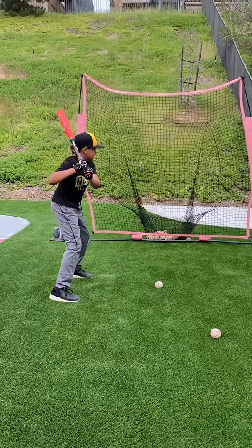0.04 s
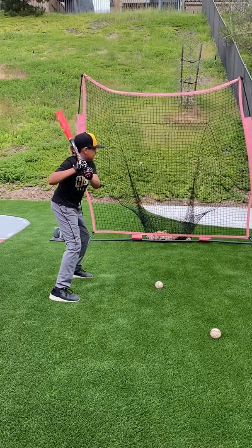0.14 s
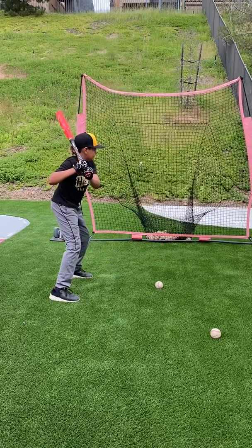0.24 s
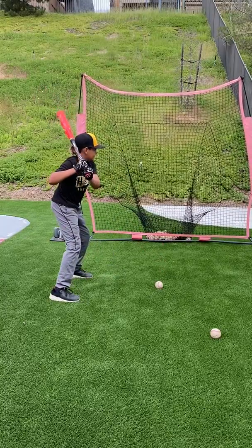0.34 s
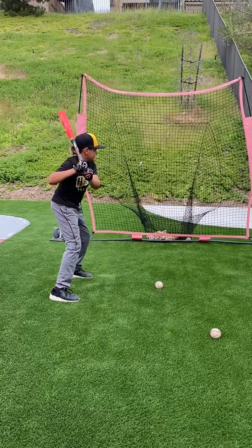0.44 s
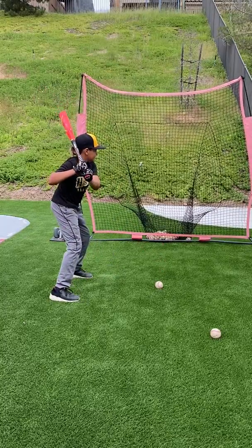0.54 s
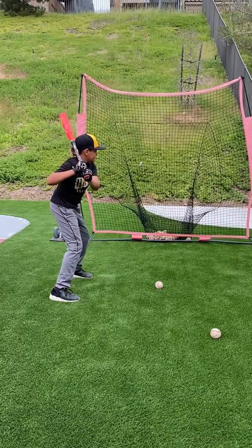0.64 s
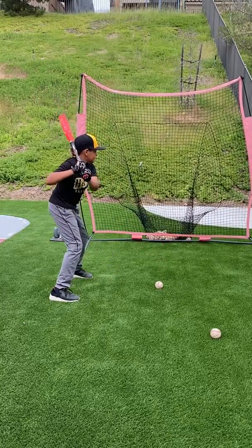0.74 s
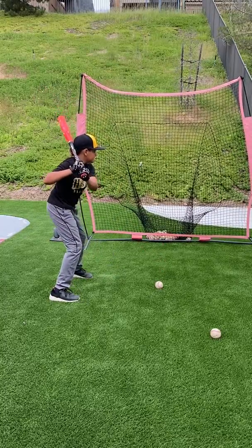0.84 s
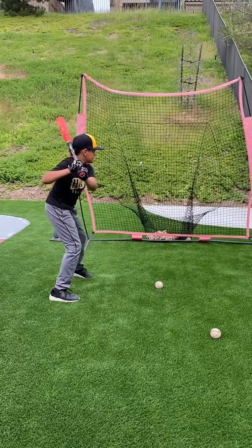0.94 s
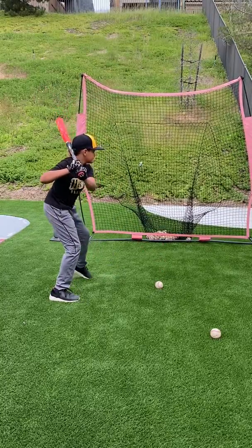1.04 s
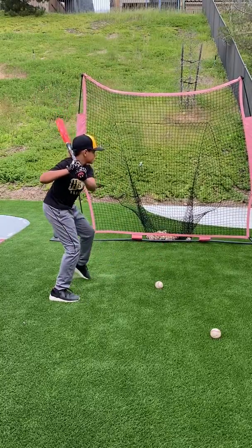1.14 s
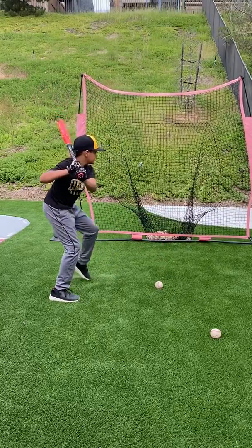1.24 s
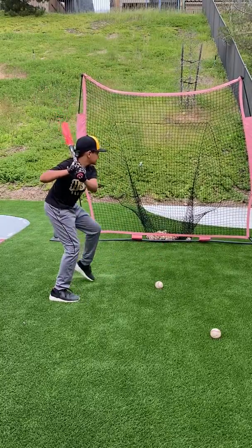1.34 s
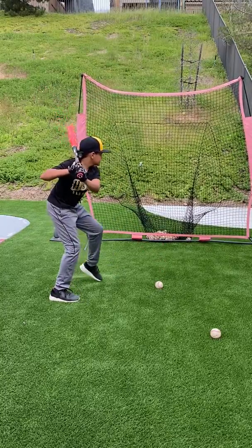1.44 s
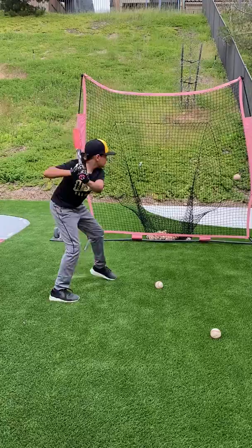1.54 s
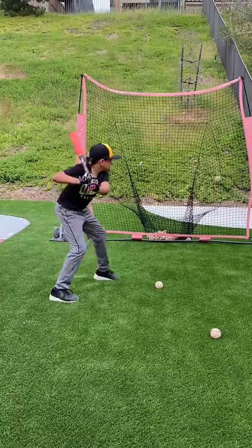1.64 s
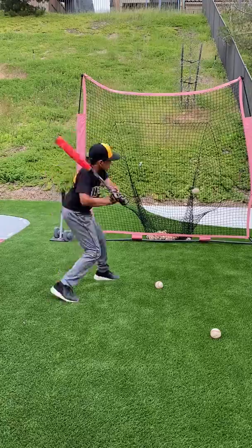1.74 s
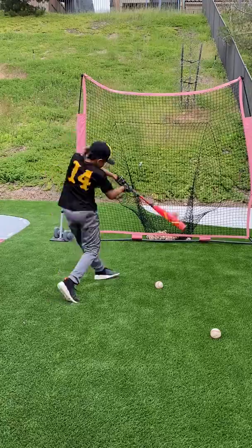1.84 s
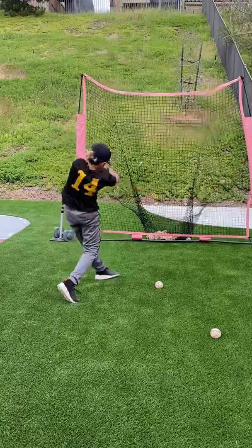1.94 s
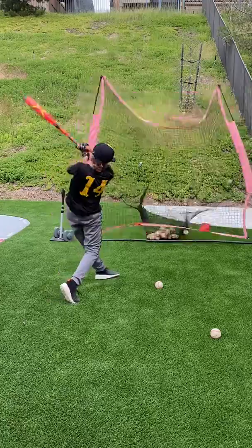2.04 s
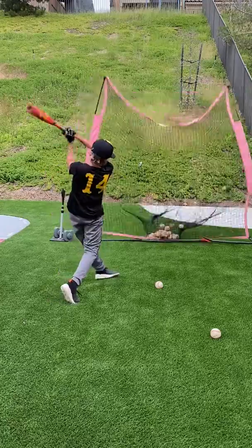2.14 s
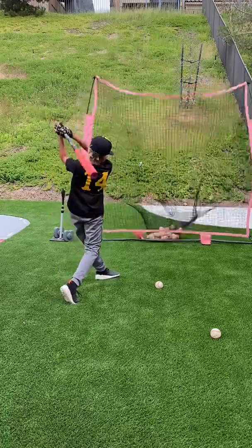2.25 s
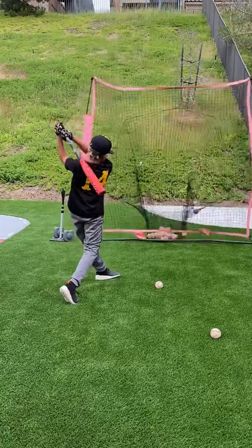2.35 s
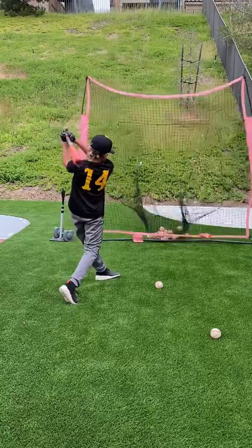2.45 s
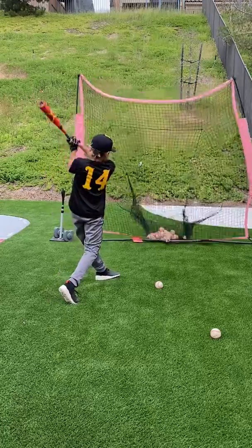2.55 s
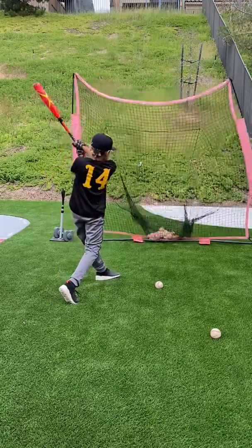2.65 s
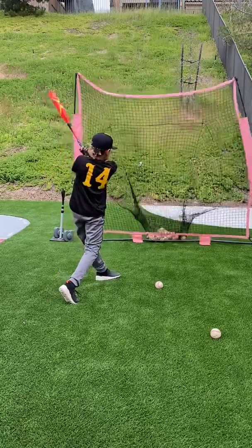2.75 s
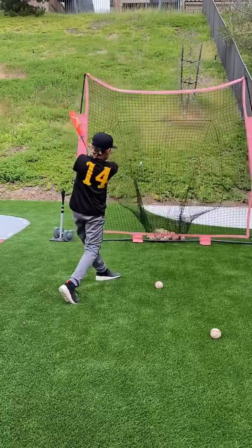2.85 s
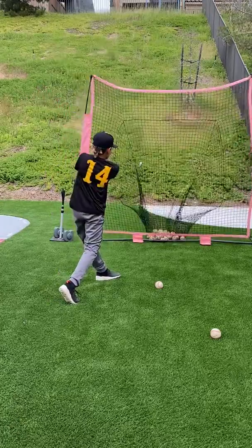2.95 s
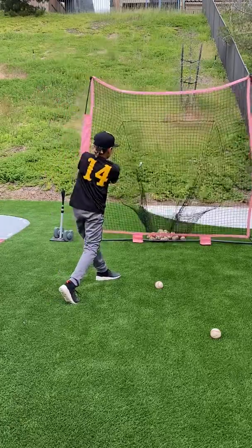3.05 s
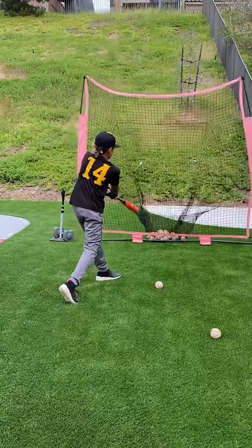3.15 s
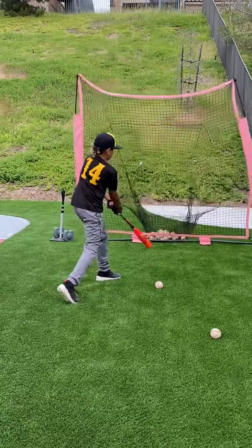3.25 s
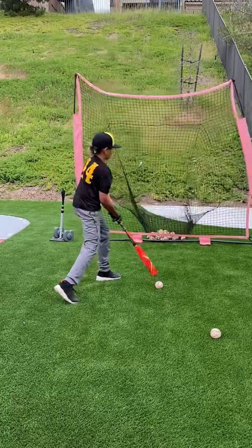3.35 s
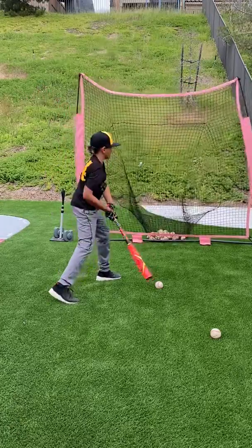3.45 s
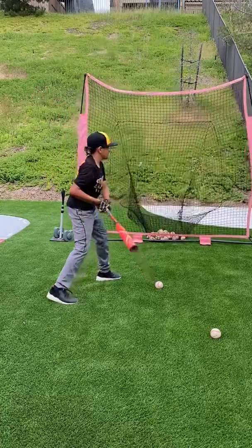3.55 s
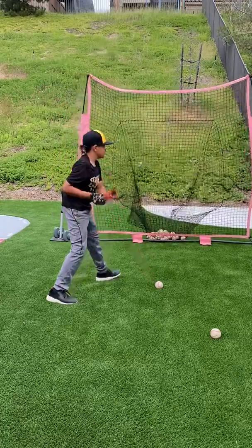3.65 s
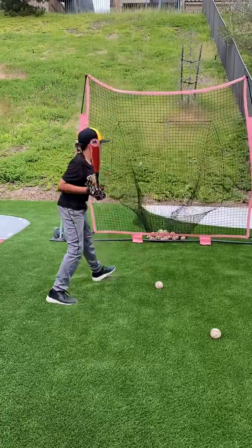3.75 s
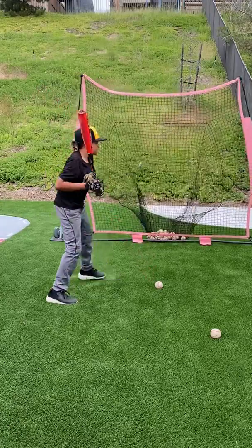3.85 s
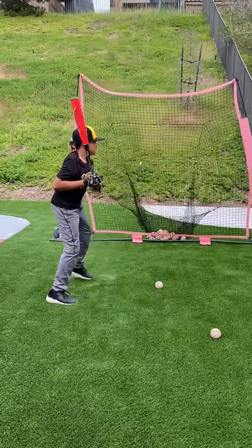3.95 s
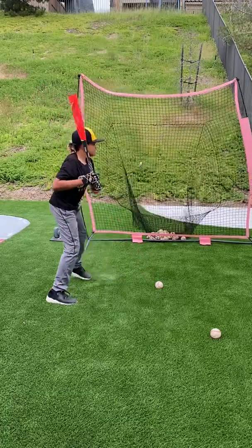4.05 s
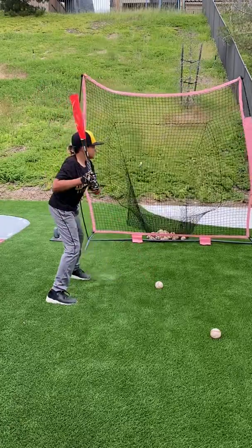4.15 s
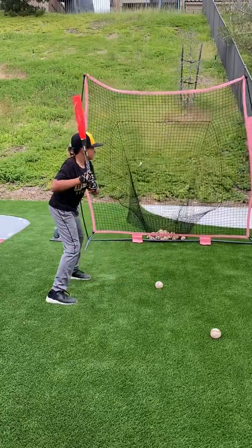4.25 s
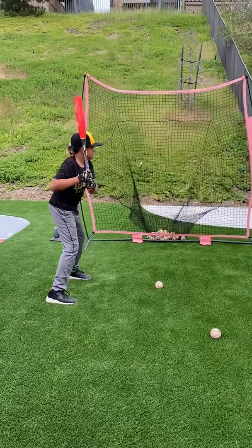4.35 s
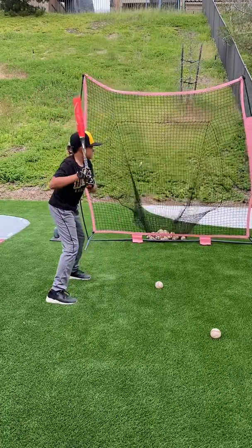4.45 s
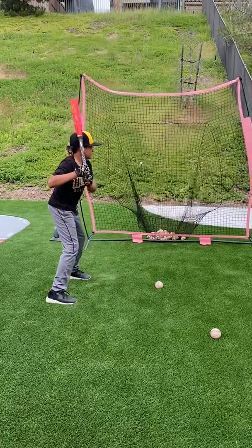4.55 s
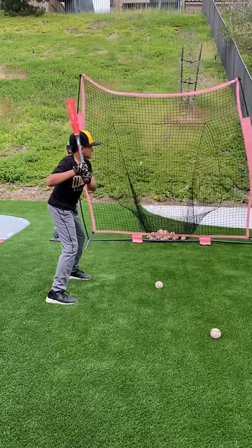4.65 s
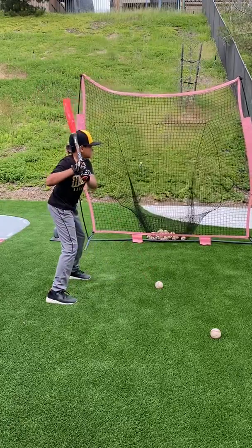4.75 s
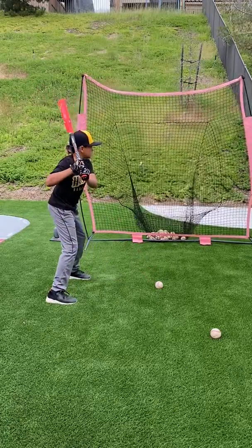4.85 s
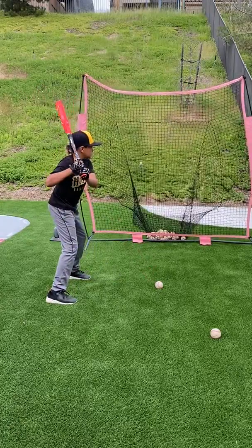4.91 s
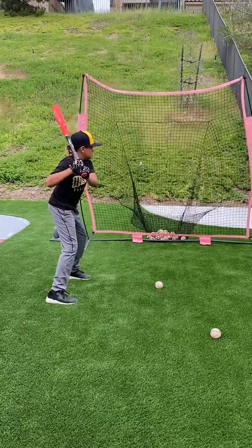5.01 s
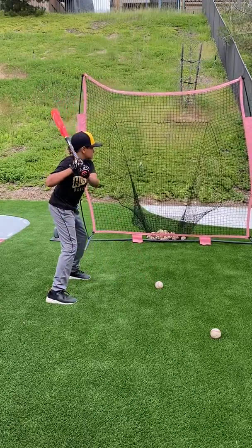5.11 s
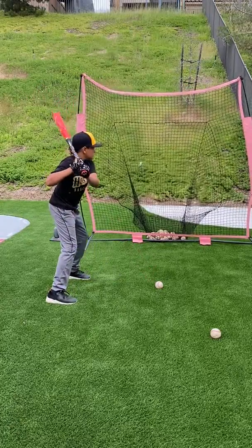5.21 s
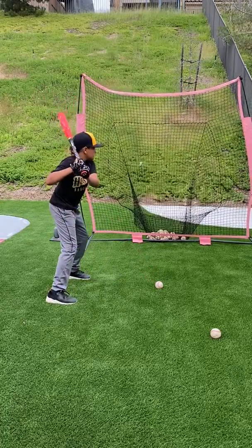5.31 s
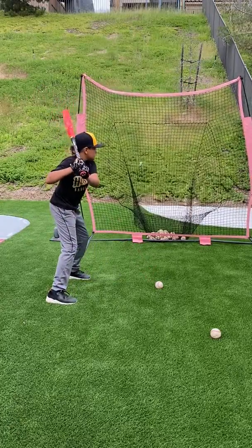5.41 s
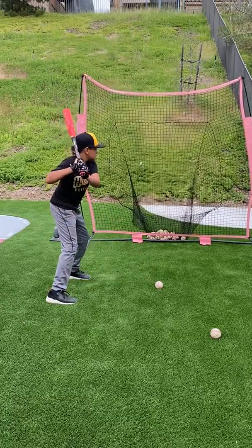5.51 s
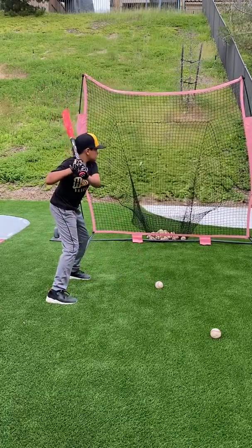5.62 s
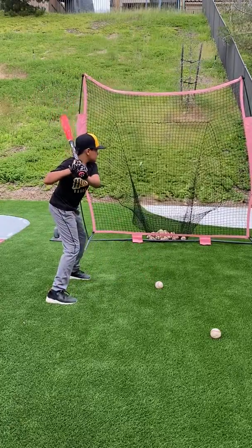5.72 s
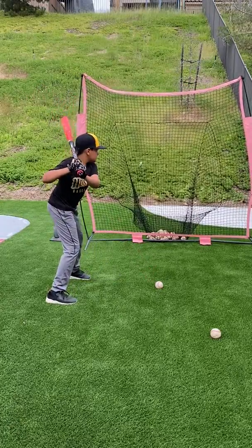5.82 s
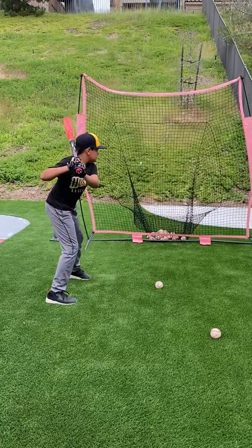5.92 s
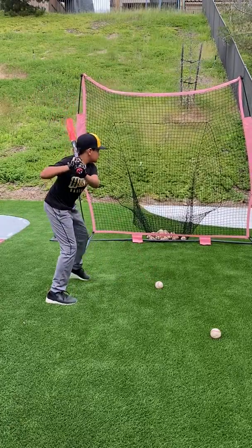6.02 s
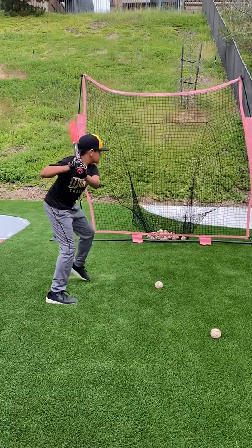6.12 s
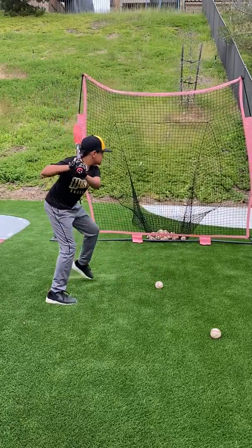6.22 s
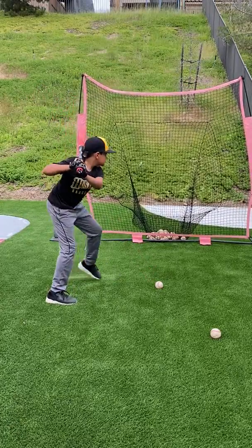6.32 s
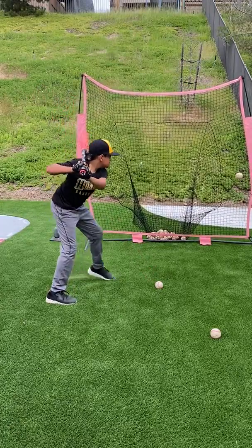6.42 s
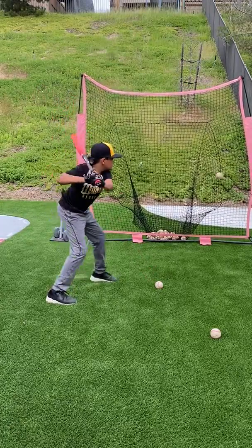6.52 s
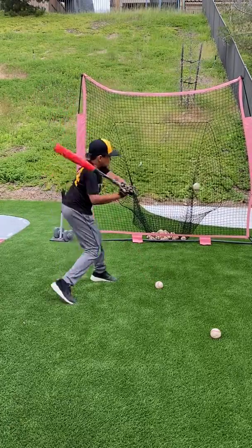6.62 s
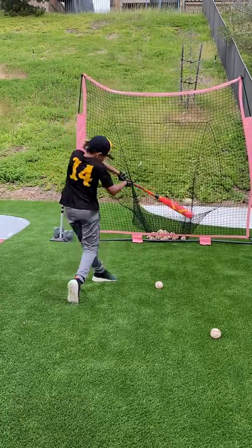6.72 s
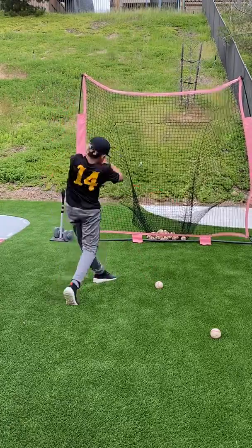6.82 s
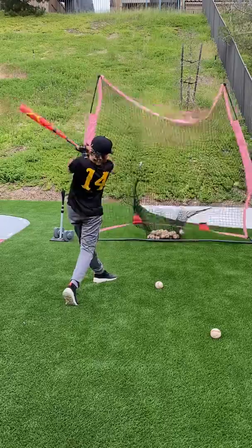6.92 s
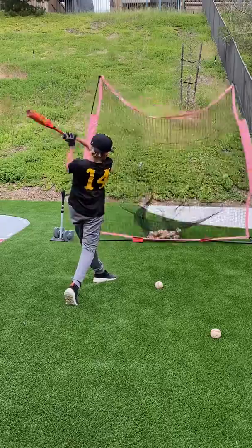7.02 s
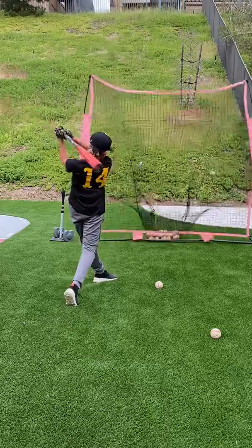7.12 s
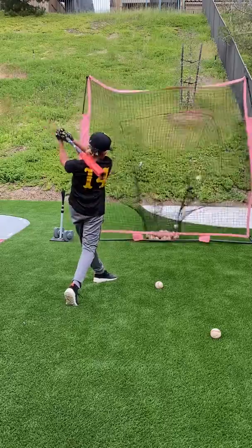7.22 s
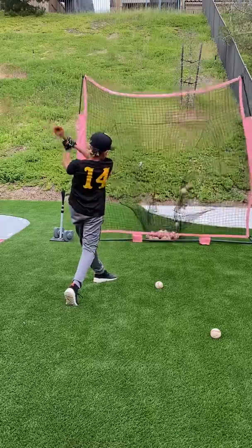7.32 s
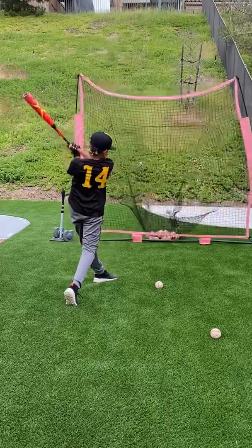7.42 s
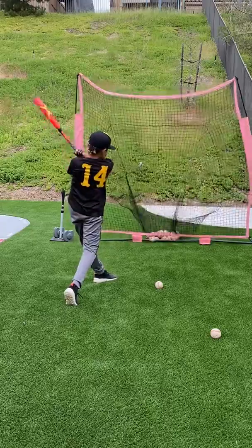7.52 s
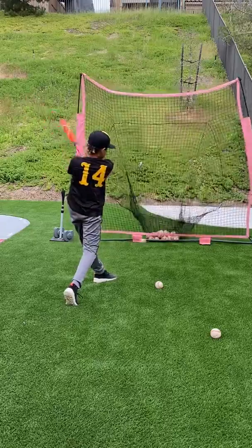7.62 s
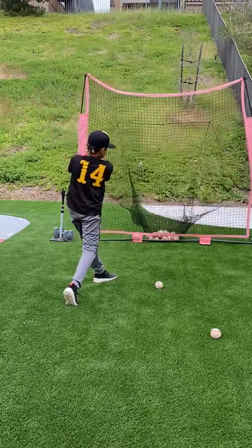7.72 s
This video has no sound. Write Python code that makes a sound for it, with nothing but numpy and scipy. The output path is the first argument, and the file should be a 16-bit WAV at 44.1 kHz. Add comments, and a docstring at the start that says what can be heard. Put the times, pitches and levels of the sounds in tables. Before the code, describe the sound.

A batter hits two balls into a practice net, nearly five seconds apart. Each blow is a short, bright, hollow knock with a brief metallic ring and tight echoes, then a dull thump and a fizzing, clattering shake of net cords. Between them come gentle clothing and footing sounds, thin chirps and far rough bird calls. Beneath lie a steady, slightly wavering plane hum and soft town rumble, captured in stereo from nearby in open air.

```python
"""A hollow bat drives a ball into a practice net twice: it knocks and rings, and fences echo it.
Damped sines make the bat and the thumps of the net; short noise bursts make its ticks. Uneven noise
makes the shaken net, the swings and the rustle of clothes and shoes. Sinking tones and two low hums of
fixed pitch make a far propeller aircraft, gliding sines the songbirds, ringing noise far hoarse calls.
Below lies a town rumble of wide noise."""
import sys
import numpy as np
from scipy import signal
from scipy.fft import rfft, irfft
from scipy.io import wavfile

SR = 44100
rng = np.random.default_rng(int(sys.argv[2]) if len(sys.argv) > 2 else 0)


def waveform_to_disk(signal):
    """Save audio, clipped to [-1, 1], as 16-bit WAV at the path in sys.argv[1]."""
    frames = np.transpose(np.atleast_2d(signal))
    scaled = np.clip(frames, -1, 1) * 32767
    samples = np.round(scaled).astype(np.int16)
    wavfile.write(sys.argv[1], SR, samples)


N = 342654   # length in samples

# bat meets ball: (time [s], level [dB], pitch factor of the spot struck)
BLOWS = [(1.8736, 2, 1.0), (6.7303, 2, 1.015)]
# short knocks of ball and barrel: (frequency [Hz], level [dB], time to die by 60 dB [s])
KNOCK_MODES = [(130, -17.5, .04), (187.4, -17, 0.048), (354, -16, .02), (508, -7.5, 0.018),
               (732, -1.5, 0.0087), (885.3, -5.5, 0.022), (1170, -7, 0.015), (2232, -14.5, 0.011),
               (2918, -17, .012), (4000, -22.5, 0.02), (4280, -28.5, 0.02)]
# hoop ring of the barrel wall: (frequency [Hz], level [dB], time to die by 60 dB [s])
HOOP_MODES = [(1372.6, 1, 0.039), (1512.8, 1.5, 0.032)]
# echoes off fences and walls: (delay [s], hoop level [dB], knock level [dB], left minus right [dB])
FENCE_ECHOES = [(.0075, -17, -10, -0.6), (0.0139, -3.5, -18.5, -1), (0.026, -19, -25.5, 2),
                (0.0325, -21.5, -31.5, -1.83), (0.04, -24, -24, 4), (.071, -31, -33, 3),
                (.084, -20.5, -22, -0.1), (.099, -29, -54.5, -7)]


def bat():
    """Each blow rings all modes and cracks; hard surfaces send copies back, the yard a diffuse tail."""
    knock = struck(KNOCK_MODES) + from_db(-20.5) * crack()
    # the barrel wall builds up over a few cycles
    build_up = signal.butter(1, [1200, 1750], "band", fs=SR, output="sos")
    hoop = from_db(-2) * signal.sosfilt(build_up, struck(HOOP_MODES))
    out = knock * sides(.1) + from_db(-4.5) * np.array([later(hoop, .0001), hoop])
    for delay, hoop_db, knock_db, pan_db in FENCE_ECHOES:
        echo = from_db(hoop_db) * hoop + from_db(knock_db) * knock
        out += later(echo, delay) * sides(pan_db)

    t = np.arange(SR) / SR
    tail_fade = from_db(-60 * t / 0.6 - 48.5) + from_db(-60 * t / .07 - 35)   # one slow, one quick
    mid, side = rng.standard_normal((2, SR)) * tail_fade * (t > .008)
    into_yard = hoop + from_db(1) * knock
    for ear, sign in enumerate((1, -1)):
        out[ear] += signal.fftconvolve(into_yard, mid + sign * .45 * side)[:N]
    return out


def struck(modes):
    """Every blow sets all the given modes ringing, each a sine that dies away."""
    out = np.zeros(N)
    click = np.eye(1, SR)[0]
    for k, (hz, db, t60) in enumerate(modes):
        sign = (-1) ** k   # every second mode starts the other way
        for s, blow_db, pitch in BLOWS:
            start = round(s * SR)
            out[start:start + SR] += sign * from_db(blow_db + db) * ring(click, hz * pitch, t60)
    return out


def crack():
    """A noise burst at each blow that dies by 60 dB in 0.022 s."""
    clicks = np.zeros(N)
    for s, db, _ in BLOWS:
        clicks[round(s * SR)] = from_db(db)
    fade = signal.lfilter([1], [1, -from_db(-60 / (0.022 * SR))], clicks)
    return signal.lfilter([1], [1, -.3], fade * rng.standard_normal(N))   # slightly dulled


# ball and net frame thump down: (time [s], level [dB], frequency [Hz], time to die by 60 dB [s])
NET_THUMPS = [(1.998, -15.5, 97, 0.0239), (2.011, -30.5, 64, 0.13), (6.856, -23.5, 113.3, 0.056),
              (6.866, -24.5, 70, 0.134), (6.909, -30, 90, 0.045), (7.585, -36, 402, 0.0154)]
# ticks and slaps of net, frame and balls: (time [s], level [dB])
NET_TICKS = [(1.9713, -30.5), (2.0039, -40), (2.0357, -41.5), (2.0504, -44.5), (2.0744, -49), (2.1083, -54),
             (2.16, -47), (2.2855, -59), (2.5111, -53), (2.59, -60), (2.638, -58), (5.216, -65.5),
             (5.754, -62.5), (6.8399, -28), (6.86, -32.5), (6.8734, -34), (6.8937, -33.5), (6.9468, -40),
             (7.0396, -44.5), (7.5778, -41.5)]
TICK_T60_S = 0.0333   # time to die by 60 dB


def net():
    """Low thumps are damped sines set off by a push, ticks are short bright noise bursts."""
    out = np.zeros(N)
    click = np.eye(1, SR // 2)[0]
    for s, db, hz, t60 in NET_THUMPS:
        part = out[round(s * SR):][:len(click)]
        part += from_db(db) * ring(click, hz, t60)[:len(part)]

    band = signal.butter(2, [2000, 7000], "band", fs=SR, output="sos")
    t = np.arange(2000) / SR
    for s, db in NET_TICKS:
        burst = rng.standard_normal(2000) * from_db(db - 60 * t / TICK_T60_S)
        out[round(s * SR):][:2000] += signal.sosfilt(band, burst)
    return out


# colours of the rubbing noise, each: (frequency [Hz], level per Hz [dB])
HISS_COLOUR = [(3000, -6), (4500, -3), (6000, -2), (7500, -7), (10000, -1), (13000, -3), (15500, -2)]
SWISH_COLOUR = [(900, -11), (1500, 2.5), (2200, -3), (3200, -6.5), (4500, -8.5), (6500, -20)]
RATTLE_COLOUR = [(150, -16), (300, 3), (600, -0.5), (1000, -4), (1500, -6.5), (2200, -21.5)]


def rustle():
    """Dense uneven grains of fibres rubbing, in three colours; the low rattle is the most uneven."""
    colours, flickers_db = (HISS_COLOUR, SWISH_COLOUR, RATTLE_COLOUR), (1.3, 1.7, 2.5)
    likeness = [(500, 0.37), (1500, 0.52), (3000, 0.93)]   # (frequency [Hz], left-right likeness)
    out = slaps(np.sqrt(shaking()[-1]))   # as strong as the rattle of the shaken net
    for gain, colour, flicker_db in zip(motion(), colours, flickers_db):
        flicker = from_db(flicker_db * (drift(27) + drift(150)))
        grains = rng.standard_normal((2, N)) * flicker
        out = out + gain * coloured(grains, colour, likeness)
    return out


SLAPS_PER_S, SLAP_DB = 200, -1   # average rate; level
SLAP_LOW_HZ, SLAP_HIGH_HZ, SLAP_CYCLES = 300, 3600, 9.0   # pitch range; cycles to die by 60 dB


def slaps(strength):
    """Cords and balls slap while the net shakes: uneven clicks dealt to twelve short resonances."""
    boost_db = 5 * np.minimum(rng.exponential(1, N), 4)
    clicks = from_db(boost_db) * (rng.random(N) < SLAPS_PER_S / SR)
    dealt = rng.integers(0, 12, N)   # which resonance each click strikes
    ringing = np.zeros(N)
    for k, hz in enumerate(np.geomspace(SLAP_LOW_HZ, SLAP_HIGH_HZ, 12)):
        ringing += ring(clicks * (dealt == k), hz, SLAP_CYCLES / hz)
    duller = signal.lfilter([1], [1, -.7], ringing)
    return from_db(SLAP_DB) * strength * rms_one(duller)


# a ball shakes the net:
# (time [s], hold [s], time to fall 20 dB [s], hiss level [dB], swish level [dB], rattle level [dB])
NET_SHAKES = [(1.953, 0.0257, .12, -56, -40, -43), (2.048, .03, .15, -65, -47, -51),
              (6.865, .035, .1, -55, -38, -44), (6.948, .01, .09, -64, -47, -50),
              (7.1, .03, .1, -73, -66, -61), (7.493, .03, .1, -81, -74, -66),
              (7.584, .005, .04, -63, -64, -54), (7.68, .03, .1, -100, -82, -59)]
SHAKE_RISE_S = .055   # time to rise 20 dB
SWAY_DB, SWAY_FALL_S = -25, .6   # it sways on, fainter; time to fall 20 dB


def shaking():
    """Hiss, swish and rattle power of the shaken net, each shake with a slower, fainter sway."""
    power = 0
    for s, hold, fall, *levels_db in NET_SHAKES:
        shake = swell(s, hold, SHAKE_RISE_S, fall)
        sway = from_db(SWAY_DB) ** 2 * swell(s, hold, SHAKE_RISE_S, SWAY_FALL_S)
        power = power + np.outer(from_db(levels_db) ** 2, shake + sway)
    return power


# a swing before each blow: (loudest this long before it [s], hiss, swish and rattle level [dB])
BAT_SWINGS = [(.19, -65, -61, -64), (.09, -68, -59, -61)]
# the swing holds; times to rise and fall 20 dB
SWING_HOLD_S, SWING_RISE_S, SWING_FALL_S = .04, .18, .3
# cloth and shoes move:
# (time [s], hold [s], time to rise 20 dB [s], to fall 20 dB [s], hiss level [dB], swish level [dB])
CLOTH_MOVES = [(0.0, .01, .1, 0.3, -94, -71), (1.073, 0.037, .12, .2, -76, -76),
               (1.3, .1, .3, .3, -90, -80), (1.56, .03, .09, .3, -75, -74), (2.25, .03, .1, .25, -73, -70),
               (2.53, .01, .15, 0.59, -77, -73), (2.66, .01, 0.64, .1, -73, -86),
               (2.87, .02, .15, .4, -87, -77), (3.28, .1, .09, .6, -80, -67),
               (3.44, .04, .15, .5, -74, -78), (3.58, .1, .3, .3, -80, -69),
               (3.78, .06, .12, .035, -69, -70), (4.0, .06, .08, .3, -84, -80),
               (4.12, .12, .12, .08, -77, -70), (4.75, .01, .06, .06, -83, -90),
               (5.76, .04, .04, 1.37, -86, -76), (5.93, .03, .2, .2, -86, -79),
               (6.04, .03, .12, .07, -74, -72), (6.49, .07, .07, .3, -73, -65)]
# between movements: (hiss level [dB], swish level [dB], rattle level [dB])
STILL_LEVELS = (-102, -94, -74)


def motion():
    """Hiss, swish and rattle gains: net shakes, swings and movements add up in power."""
    power = shaking() + from_db(STILL_LEVELS)[:, None] ** 2
    for (s, *_), (lead, *levels_db) in zip(BLOWS, BAT_SWINGS):
        swing = swell(s - lead, SWING_HOLD_S, SWING_RISE_S, SWING_FALL_S)
        power += np.outer(from_db(levels_db) ** 2, swing)
    for s, hold, rise, fall, *levels_db in CLOTH_MOVES:
        power[:2] += np.outer(from_db(levels_db) ** 2, swell(s, hold, rise, fall))   # no rattle
    return np.sqrt(power)


def swell(s, hold, rise, fall):
    """Power of a sound that rises, holds from time s and falls; rise and fall are the times for 20 dB."""
    t = np.arange(N) / SR - s
    steps_down = np.maximum(-t / rise, (t - hold) / fall)   # in steps of 20 dB
    return 100.0 ** -np.maximum(steps_down, 0)


# strongest aircraft tone: (time [s], level [dB])
STRONGEST_LEVEL = [(0.1, -50), (0.5, -54), (1.1, -71.5), (1.5, -62.5), (2.15, -52), (3.9, -53.5),
                   (5.3, -47), (6.4, -45), (7.3, -47.5), (7.7, -50.5)]
STRONGEST_MULTIPLE, STRONGEST_PAN_DB, STRONGEST_LEAD = 6, 0, 0.39   # left lead in radians
# weaker tones, fading in and out as two paths cancel:
# (shaft multiple, level [dB], growth [dB/s], second path [0-1], fades [1/s], first fade [s],
#  left minus right [dB], left lead [radians])
WEAKER_TONES = [(4, -59, 0.6161, .55, .42, .9, -1, .1), (8, -67, 0.77, .4, .36, 1.6, -2.5, .1),
                (9, -66.5, 0.7838, .3, .43, 2.3, 2, .1), (12, -66, 0.114, .55, .22, 3.5, 1.39, .1),
                (16, -86, 1.29, 0.3, .35, 1.6, 4.5, .083)]
# second engine tone: (level [dB], growth [dB/s], second path [0-1], fades [1/s], first fade [s])
SECOND_ENGINE = (-55, -0.9847, 0.1, 0.28, 3.5)
# low hums of fixed pitch: (frequency [Hz], level [dB])
LOW_HUMS = [(66.8, -75.5), (79.1, -72.5)]
SHAFT_HZ, SHAFT_FALL = 22.475, .0505   # turns per s; sinking in Hz per s as it passes
SECOND_HZ, SECOND_FALL = 96.4, .32   # Hz; sinking in Hz per s


def aircraft():
    """Tones on shaft multiples and one other tone slide down slowly; two low hums hold their pitch."""
    t = np.arange(N) / SR
    shaft_angle = 2 * np.pi * (SHAFT_HZ - SHAFT_FALL * t / 2) * t
    second_angle = 2 * np.pi * (SECOND_HZ - SECOND_FALL * t / 2) * t
    out = fading(*SECOND_ENGINE) * sides(-1.2) * np.sin(second_angle)

    strongest = from_db(np.interp(t, *np.transpose(STRONGEST_LEVEL)))
    tones = [(STRONGEST_MULTIPLE, strongest, STRONGEST_PAN_DB, STRONGEST_LEAD)]
    for multiple, db, growth_db, second, per_s, first, pan_db, lead in WEAKER_TONES:
        tones.append((multiple, fading(db, growth_db, second, per_s, first), pan_db, lead))
    for multiple, gain, pan_db, lead in tones:
        phase = multiple * shaft_angle + rng.uniform(0, 2 * np.pi) + np.array([[lead], [0]])
        waver = from_db(0.74 * drift(3))   # the level wavers on the long way
        out = out + gain * waver * sides(pan_db) * np.sin(phase)

    for hz, db in LOW_HUMS:
        out = out + from_db(db + 3 * drift(1.5)) * np.sin(2 * np.pi * hz * t)
    return np.sqrt(2) * out   # the levels above are rms levels


def fading(db, growth_db, second, per_s, first):
    """Gain of a tone that reaches us by two paths, which cancel now and then."""
    t = np.arange(N) / SR
    turning = np.exp(2j * np.pi * per_s * (t - first))
    return from_db(db + growth_db * t) * np.abs(1 - np.clip(second, 0, 1) * turning)


# clearest bird notes, slides, arches and dips:
# (time [s], length [s], start [Hz], middle [Hz], end [Hz], level before the paths to the ear [dB])
BIRD_NOTES = [(0.032, .045, 3340, 3563, 2900, -79), (.078, .03, 3300, 4150, 3800, -81),
              (.15, .035, 3500, 4100, 3640, -82), (0.44, 0.0407, 5200, 4944, 4850, -77),
              (0.51, 0.057, 4500, 4550, 3950, -80), (.615, .03, 4060, 4000, 4050, -86),
              (0.692, 0.0554, 3540, 4400, 3070, -77.5), (0.816, 0.0244, 3640, 3600, 3090, -76.5),
              (0.86, 0.057, 3400, 4317, 3100, -76), (1.02, .035, 4600, 4510, 4500, -79),
              (1.33, .025, 6500, 6300, 5000, -84), (1.122, 0.029, 5000, 4900, 4900, -74),
              (1.201, 0.038, 4470, 4500, 4320, -76), (1.235, 0.037, 3797, 2783, 4300, -78.5),
              (1.24, 0.0367, 6600, 6260, 4600, -79.5), (1.275, 0.0247, 4500, 3600, 2640, -71),
              (1.27, 0.046, 4450, 4500, 4440, -72), (1.338, 0.024, 5020, 4200, 3300, -73.5),
              (1.345, 0.029, 4650, 4470, 4630, -71), (1.37, 0.0223, 3556, 3737, 3850, -72),
              (1.392, 0.0336, 3687, 3060, 2700, -72.5), (1.419, 0.024, 6400, 5470, 4600, -82),
              (1.44, 0.029, 4505, 4550, 4450, -76), (1.435, .06, 3900, 3697, 2806, -72),
              (1.503, 0.0405, 4550, 4065, 3670, -69), (1.57, .034, 4500, 4280, 3460, -69.5),
              (1.55, .025, 6600, 6300, 6300, -75), (1.625, .025, 6500, 6260, 6500, -76),
              (3.338, 0.032, 3120, 3660, 3820, -71), (4.498, .034, 3285, 3680, 4480, -74.5),
              (4.586, .025, 3700, 4100, 4390, -80), (4.66, 0.045, 3400, 3846, 3850, -79),
              (4.698, 0.039, 3800, 3257, 3414, -74), (4.775, .045, 3256, 3258, 3300, -80),
              (4.825, .035, 3400, 3800, 4470, -73), (4.912, .022, 3400, 3700, 4310, -79),
              (4.94, 0.0471, 3800, 2619, 4000, -78.5), (5.02, 0.0417, 3700, 2902, 2446, -83),
              (5.086, 0.058, 3300, 3950, 2910, -79.5), (5.198, .03, 4400, 4400, 3940, -77),
              (5.228, 0.0322, 4700, 3900, 3290, -72), (5.32, 0.032, 4000, 3310, 3940, -74),
              (5.435, 0.047, 4100, 3318, 4402, -72), (5.48, .013, 4400, 3900, 3105, -78),
              (5.454, 0.0312, 6260, 5400, 5140, -81.5), (5.535, .05, 5400, 5150, 5300, -86),
              (5.29, .025, 4400, 4550, 4300, -79), (5.35, .025, 3500, 3800, 3700, -76),
              (5.52, .035, 3900, 3340, 3800, -79), (5.575, 0.0478, 3500, 3895, 3016, -74.5),
              (5.67, .06, 3900, 4120, 2945, -71), (5.74, 0.037, 3200, 4394, 3106, -77.5),
              (5.787, .03, 3880, 3710, 3070, -76.5), (5.835, .055, 3700, 4396, 3600, -72),
              (5.945, 0.037, 3700, 2700, 3810, -72.5), (5.98, 0.0192, 3800, 3400, 2750, -73),
              (6.004, 0.0222, 3700, 3100, 2810, -73.5), (6.075, 0.026, 3500, 3200, 2380, -73.5),
              (6.213, 0.0367, 5320, 5213, 5240, -81), (6.244, 0.068, 4000, 3440, 3764, -72.5),
              (6.197, .03, 4590, 4640, 4607, -81), (6.255, .045, 6180, 6550, 6400, -80.5),
              (6.265, .03, 4770, 4670, 4650, -77.5), (6.28, 0.039, 7070, 7070, 7020, -79),
              (6.32, .07, 3750, 3406, 3660, -77), (6.415, .05, 3510, 4000, 3380, -75),
              (6.289, 0.045, 5300, 5233, 5190, -78), (6.33, 0.0426, 6390, 6370, 6460, -75.5),
              (7.07, .016, 3800, 3400, 3000, -68), (7.102, 0.0155, 4800, 3972, 3060, -64.5),
              (7.18, 0.0295, 3300, 3670, 4000, -68), (7.215, .035, 3800, 3106, 2794, -73),
              (7.295, 0.0185, 3100, 3047, 3160, -70), (7.34, 0.029, 4200, 3000, 2200, -76),
              (7.385, .025, 2300, 3293, 3950, -75.5), (7.475, 0.0704, 2800, 4140, 3480, -71),
              (7.655, 0.043, 3600, 3750, 4093, -75), (7.695, 0.0293, 4100, 3450, 2660, -69.5),
              (7.72, .035, 3000, 3900, 2600, -73), (7.74, .03, 3600, 3900, 4200, -72),
              (7.59, .04, 4200, 3900, 3500, -72)]


def birds():
    """Near singers arrive straight and by echoes among leaves and houses, the far twitter by echoes alone."""
    near, far = whistles(BIRD_NOTES), whistles(twitter())
    t = np.arange(SR // 3) / SR
    echo_fade = from_db(-60 * t / .17 - 27) * (t > .006)
    blur = rng.standard_normal((2, len(t))) * echo_fade
    song = near + from_db(9) * far
    mid, side = signal.fftconvolve([song, song], blur, axes=1)[:, :N]
    wall = from_db(-5) * later(near, .027)
    straight = from_db(5.5) * near
    return (straight + wall + mid + 0.52 * side * np.array([[1], [-1]])) * sides(3.9)


def whistles(notes):
    """Gliding sines whose pitch quavers a little."""
    out = np.zeros(N + SR)
    quaver_hz = 60 * drift(120)
    for s, length, start, middle, end, db in notes:
        # the note runs from -1 to 1; it fades in and out a little beyond
        u = np.linspace(-1.15, 1.15, round(1.15 * length * SR))
        at = round((s - .075 * length) * SR)
        slope, bend = (end - start) / 2, (start + end) / 2 - middle
        hz = middle + slope * u + bend * u ** 2 + np.resize(quaver_hz[at:], len(u))
        tone = np.sin(2 * np.pi * np.cumsum(hz) / SR)
        out[at:at + len(u)] += from_db(db) * np.hanning(len(u)) ** .5 * tone
    return out[:N]


# quick far twitter:
# (from [s], to [s], chirps [1/s], typical top [Hz], typical sweep [Hz], loudest level before the echoes [dB])
FAR_TWITTER = [(0.1, .4, 30, 4170, 500, -83), (.34, .5, 50, 5500, 300, -80.5), (.5, .8, 35, 5300, 700, -84),
               (0.7, 1.0, 36.7, 4575, 1013, -78.5), (1.03, 1.85, 43.8, 5190, 700, -73),
               (1.08, 1.46, 45, 7200, 1500, -78), (2.1, 2.65, 89, 4900, 1300, -76),
               (4.5, 5.7, 39.6, 4300, 902.6, -82.5), (5.716, 6.2, 55, 4098, 1403, -77),
               (6.331, 6.72, 40.5, 5200, 900, -71.5), (7.007, 7.5, 59.1, 4700, 1000, -72)]


def twitter():
    """Notes drawn by chance: most plunge from the top, some climb to it."""
    notes = []
    for start, end, per_s, top_hz, sweep_hz, db in FAR_TWITTER:
        draws = rng.random((50, 5))
        times = start + np.cumsum((.5 + draws[:, 0]) / per_s)
        for s, (_, high, deep, loud, climbs) in zip(times[times < end], draws):
            top = top_hz * (.85 + 0.17 * high)
            sweep = sweep_hz * (0.39 + 1.3 * deep)
            glide = [top, top - 0.33 * sweep, top - sweep]
            if climbs < .35:
                glide = glide[::-1]
            notes.append((s, .018, *glide, db - 8 * loud))
    return notes


# far hoarse calls: (time [s], length [s], lower [Hz], its level [dB], upper [Hz], its level [dB])
HOARSE_CALLS = [(2.337, 0.142, 756.6, -61.5, 916, -59), (2.747, 0.209, 795, -62, 939.4, -73.5),
                (3.167, 0.19, 776.4, -66, 930.5, -69.5), (3.62, 0.133, 772.6, -65.5, 896.8, -61),
                (4.57, 0.16, 804, -62, 922, -65.5)]


def far_calls():
    """Noise rings two resonances: rough partials that swell and fade together."""
    out = np.zeros((2, N))
    for s, length, low_hz, low_db, high_hz, high_db in HOARSE_CALLS:
        size = round(length * SR)
        noise = rng.standard_normal((2, 2, size))
        low = from_db(low_db) * rms_one(ring(noise[0], low_hz, 0.131))
        high = from_db(high_db) * rms_one(ring(noise[1], high_hz, 0.074))
        out[:, round(s * SR):][:, :size] += (low + high) * np.hanning(size) ** .5
    return out


# colour of the town rumble: (frequency [Hz], level per Hz [dB])
AIR_COLOUR = [(15, -48), (25, -16.5), (69, 1.5), (107, -4.5), (227, -18.5), (274, -16), (349, -23.5),
              (582, -25.5), (848, -23.5), (1750, -36.5), (2230, -57), (4040, -54.5), (8580, -56.5),
              (10100, -61.5), (15500, -75)]
# how alike its two sides are: (frequency [Hz], left-right likeness)
AIR_LIKENESS = [(60, 0.73), (300, 0.34), (640, 0.28), (1400, 0.15), (2500, 0.93), (7000, 0.61)]
AIR_DB = -55   # middle level


def town_rumble():
    """Wide noise, strongest in the bass, whose level drifts slowly."""
    noise = rng.standard_normal((2, N))
    return from_db(AIR_DB + 0.56 * drift(0.8)) * coloured(noise, AIR_COLOUR, AIR_LIKENESS)


def from_db(db):
    """Gain of a level."""
    return 10 ** (np.asarray(db) / 20)


def rms_one(x):
    """Scaled to rms 1."""
    return x / np.sqrt(np.mean(x ** 2) + 1e-20)


def at_hz(points, hz):
    """A table read on a log-frequency axis."""
    table_hz, values = np.transpose(points)
    return np.interp(np.log(hz), np.log(table_hz), values)


def sides(db):
    """Left and right gain of a level difference."""
    return from_db([[db / 2], [-db / 2]])


def later(x, s):
    """Delayed by s seconds."""
    return np.roll(x, round(s * SR))


def drift(rate):
    """Smoothed noise of spread 1 that wanders by chance, faster for a higher rate."""
    r = np.exp(-80 * np.pi * rate / SR)   # one step lasts 40 samples
    noise = rng.standard_normal(N // 40 + 2002)
    slow = signal.lfilter([1], [1, -2 * r, r * r], noise)[2000:]   # start-up left out
    return np.interp(np.arange(N) / 40, np.arange(len(slow)), rms_one(slow))


def ring(clicks, hz, t60):
    """A unit click sets a sine of starting height 1 ringing; it dies by 60 dB in t60 seconds."""
    r, w = from_db(-60 / (t60 * SR)), 2 * np.pi * hz / SR
    return signal.lfilter([0, np.sin(w)], [1, -2 * r * np.cos(w), r * r], clicks + 1e-18)


def coloured(source, spectrum, likeness):
    """Two unrelated noises become a stereo pair with the given spectrum, closed at its ends; rms 1."""
    hz = np.maximum(np.fft.rfftfreq(N, 1 / SR), 1)
    inside = (hz > spectrum[0][0] * .7) & (hz < spectrum[-1][0] * 1.3)
    mid, side = rfft(source) * from_db(at_hz(spectrum, hz)) * inside
    alike = np.clip(at_hz(likeness, hz), -1, 1)
    pair = np.sqrt(1 + alike) * mid + np.sqrt(1 - alike) * side * [[1], [-1]]
    return rms_one(irfft(pair, N))


def scene():
    """Everything that reaches the microphones."""
    return bat() + net() + rustle() + aircraft() + birds() + far_calls() + town_rumble()


SPLIT_HZ, TURN_HZ = 6800, 3330   # above SPLIT the left channel falls one cycle behind per TURN
CUTOFF_HZ = 15800


def record(dry):
    """Loud peaks duck the level and are rounded; deep bass and top are cut; the left treble lags."""
    over_db = np.maximum(20 * np.log10(np.abs(dry).max(0) + 1e-9) + 20, 0)   # above -20 dB
    recovery_db = 60 * np.arange(N) / SR   # 60 dB per s
    held_db = np.maximum.accumulate(0.48 * over_db + recovery_db) - recovery_db
    duck_db = signal.lfilter([.002], [1, -.998], held_db)   # smoothed
    x = dry * from_db(-duck_db)
    x = signal.sosfilt(signal.butter(2, 45, "high", fs=SR, output="sos"), x)
    x = 0.8272 * np.tanh(x / 0.7017)
    lag = 2 * np.pi * np.maximum(np.fft.rfftfreq(N, 1 / SR) - SPLIT_HZ, 0) / TURN_HZ
    left = irfft(rfft(x[0]) * np.exp(-1j * lag), N)
    top_cut = signal.cheby2(14, 70, CUTOFF_HZ * 1.04, fs=SR, output="sos")
    return signal.sosfilt(top_cut, np.array([left, x[1]]))


dry = scene()
out = record(dry)
waveform_to_disk(out)
```